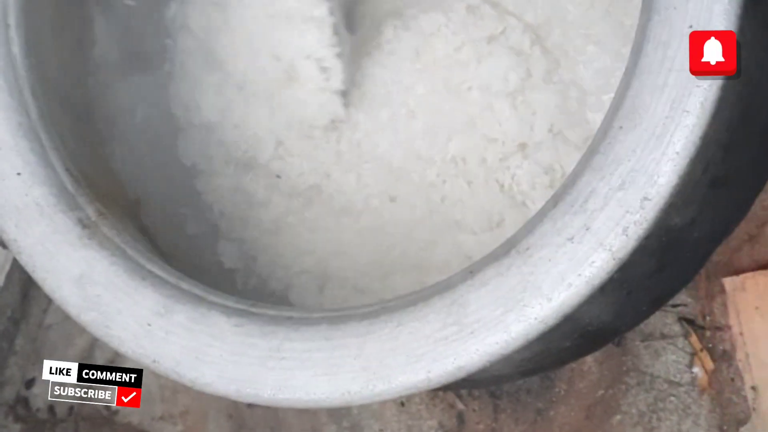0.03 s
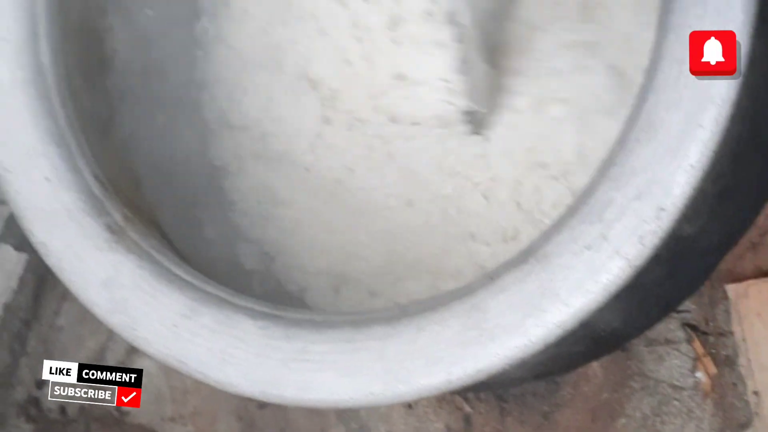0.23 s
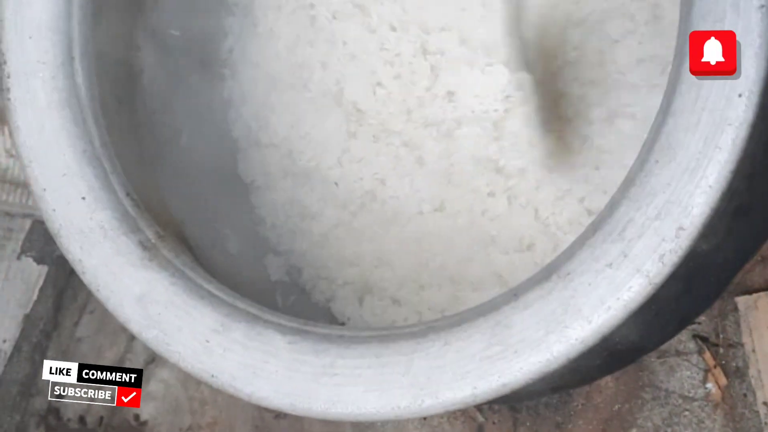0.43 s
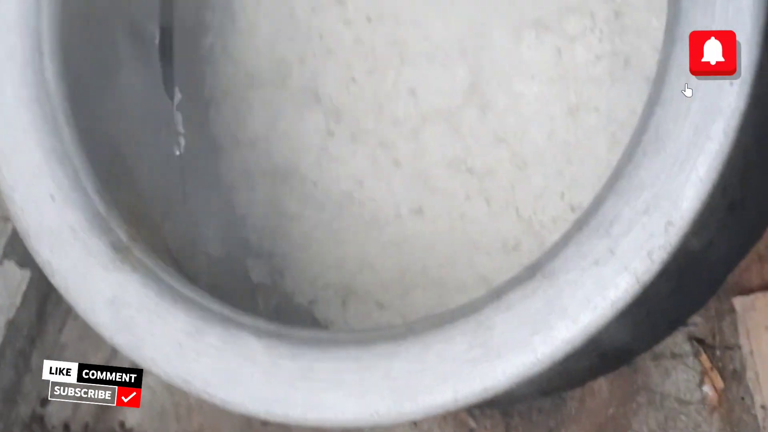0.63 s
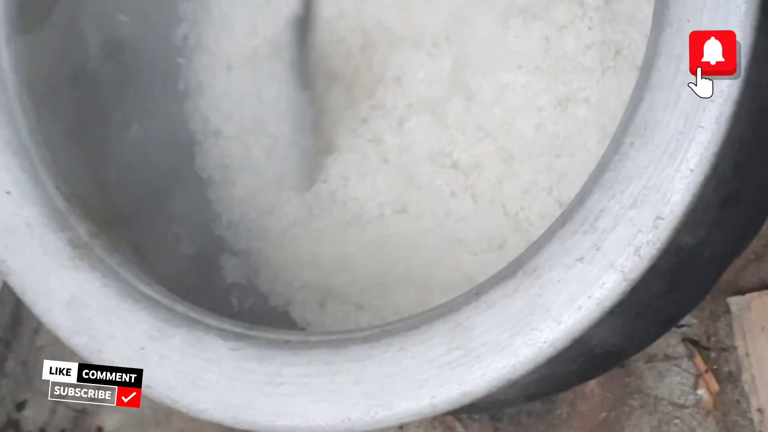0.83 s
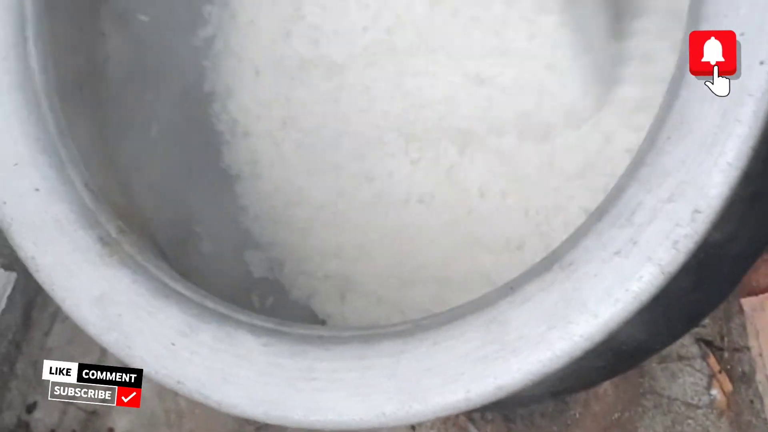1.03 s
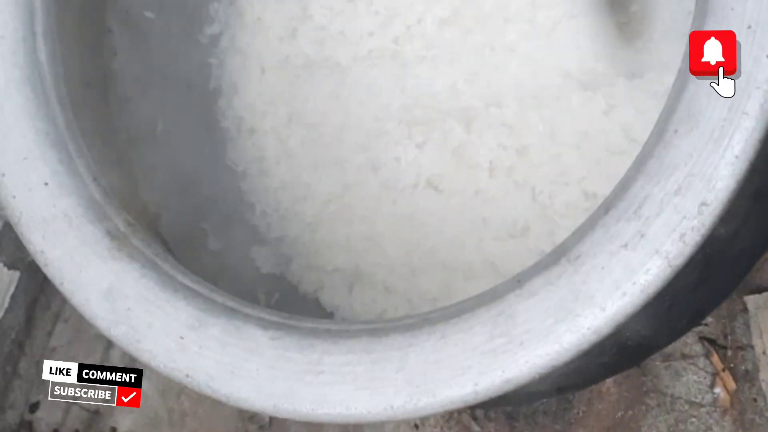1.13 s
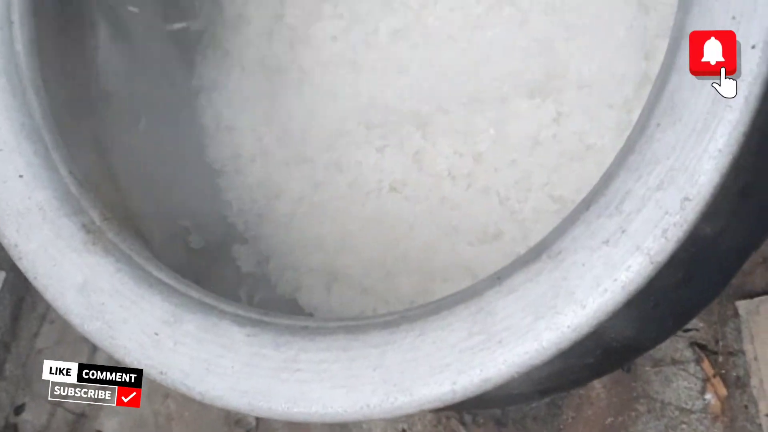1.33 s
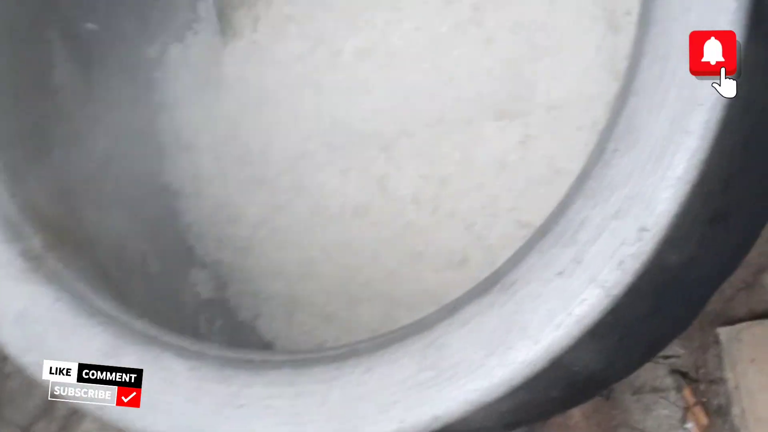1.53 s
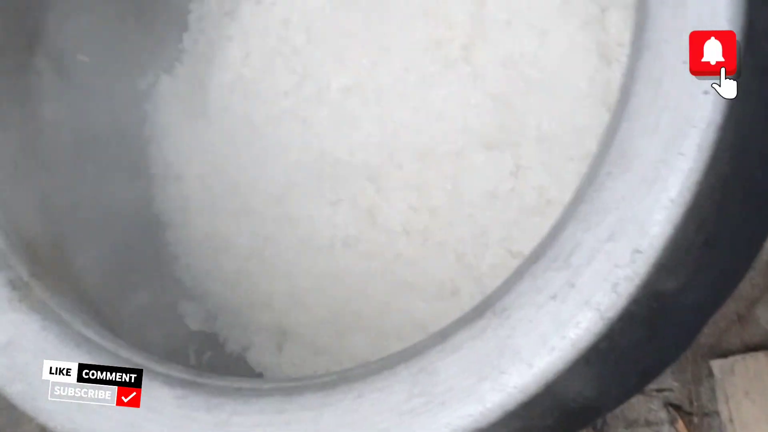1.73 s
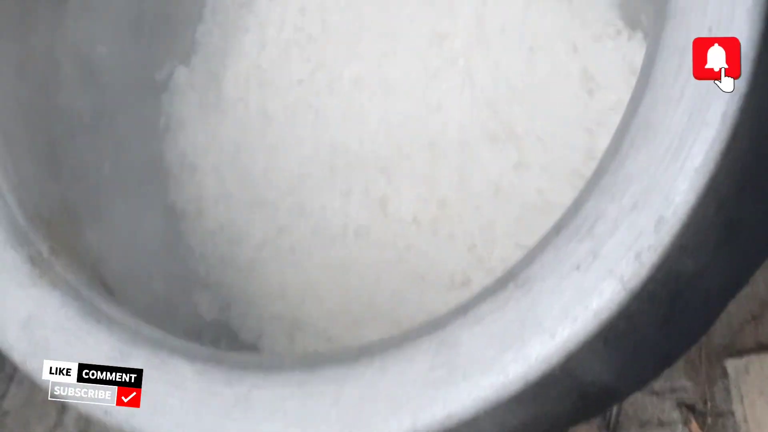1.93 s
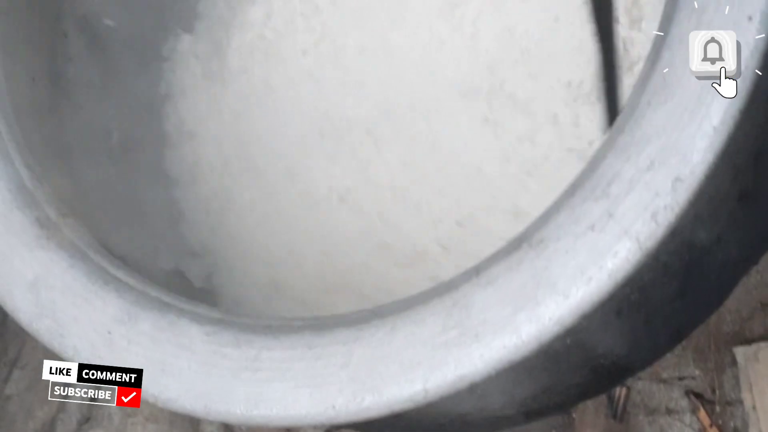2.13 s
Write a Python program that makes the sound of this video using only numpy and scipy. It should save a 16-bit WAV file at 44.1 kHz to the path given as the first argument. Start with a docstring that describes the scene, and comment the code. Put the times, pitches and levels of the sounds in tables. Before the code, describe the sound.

Water splashes into a metal pot of rice in a quiet kitchen. Until about 1.4 seconds there are only faint rubs against the pot over a low rumble. At 1.5 seconds water slaps in with sharp cracks on the metal, becoming a hollow, drumming rush with bright spray and short ringing notes. It peaks around 1.8 to 2 seconds, then dies away. Nearly everything is on the right.

```python
"""A quiet kitchen: over the low rumble of the house come faint rubs against a metal pot of rice.
Then water suddenly hits the pot: a first slap, a drumming rush, a bright spray that dies away.
The impacts of the drops splash broadly and force the pot's air space and walls to resonate; single
notes sing out, and hard contacts crack on the wall. The sound lies on the right; the left carries
only a dull, faint leak and a diffuse wash."""
import sys
import numpy as np
from scipy import signal
from scipy.io import wavfile

SR = 44100
rng = np.random.default_rng(int(sys.argv[2]) if len(sys.argv) > 2 else 0)


def store_wav(level_fs):
    """Save 16-bit WAV to argv[1]."""
    pcm = np.round(np.clip(np.atleast_2d(level_fs), -1, 1) * 32767)
    wavfile.write(sys.argv[1], SR, pcm.T.astype(np.int16))


N = 96402

# Force of the stream in seven registers (all levels in the tables are relative):
# t/s, then level/dB of slosh, thrum, hollow, low wall ring, high wall ring, spray, mist
STREAM_FORCE = [(1.528, -52, -31, -28, -52, -51, -52.5, -80),
                (1.574, -49, -36, -32.5, -56.5, -55, -62, -77),
                (1.642, -35.5, -32.5, -29.5, -44.5, -41, -50, -64),
                (1.67, -41.5, -27, -25.5, -46, -43, -47.5, -63.5),
                (1.686, -31.5, -36, -32.5, -60, -29, -39.5, -62),
                (1.698, -50, -32.5, -25.5, -44, -36, -51.5, -67),
                (1.712, -30, -26.5, -48, -41, -31.5, -44.5, -70),
                (1.728, -36, -24.5, -39, -37.5, -49, -46, -65),
                (1.746, -36, -28.5, -39, -40, -45, -47.5, -63),
                (1.774, -29.5, -35, -60, -40.5, -41.5, -54, -64.5),
                (1.798, -33, -39, -31, -29.5, -35, -47, -63),
                (1.836, -53, -37.5, -33.5, -36.5, -30.5, -42.5, -64.5),
                (1.958, -50, -33.5, -41.5, -33, -29.5, -39.5, -56),
                (1.98, -33, -34, -62, -36.5, -30, -41, -61), (2.002, -33, -36, -42, -34, -40, -52, -70),
                (2.026, -44, -28.5, -39, -61, -40, -59, -74),
                (2.064, -42.5, -35, -48, -47, -49, -52.5, -68),
                (2.146, -43, -46, -35.5, -51.5, -53.5, -58, -76),
                (2.156, -52, -44, -43, -52, -45.5, -54, -76), (2.186, -52, -38, -48.5, -58, -54, -65, -76)]
# Slaps of water on the metal: t/s, low level/dB, wall ring level/dB, spray level/dB, decay/s
WATER_SLAPS = [(1.4563, -35.5, -42, -47, 0.027), (1.465, -57, -57, -42, 0.014),
               (1.5215, -29.5, -39, -43, 0.008), (1.531, -27, -60, -46, 0.0036),
               (1.685, -52, -32, -47, 0.0033), (1.71, -30.5, -48, -38, 0.0058),
               (1.787, -24.5, -47, -35, 0.0038), (1.799, -29, -31.5, -36.5, 0.0032),
               (1.984, -42, -46, -46, 0.0018)]
# Normal modes of the pot's air space and walls: f/Hz, bandwidth/Hz, level/dB
POT_MODES = [(240.6, 24, -3.5), (296, 19.4, 3), (354.8, 18, -1.5), (399, 34, -4.5), (617, 38.6, -2),
             (636.5, 42, -2), (713.3, 31, -1.5), (743, 27.4, -1), (1041, 25, 7), (1168.6, 45, 4),
             (1686, 13, -7), (1842.6, 19, 5), (1944, 15, 4.5), (1996, 122, 1), (2235, 12.4, 3),
             (2343, 21, 6), (2444, 24, -5), (2805, 31, 0), (3160, 22, 4), (3295, 35, -2.5), (3580, 15, -3),
             (3670, 41, -7), (4366, 17, -1), (5050, 28, -5)]
# Edges of the five registers into which the modes fall: f/Hz
MODE_EDGES = [200, 480, 975, 1300, 2900, 7000]
# Spectrum of the broad splash as heard, with a deep dip near 9 kHz: f/Hz, level/dB
SPLASH_SPECTRUM = [(90, -17), (316, -1), (581, -5.5), (737, 3), (876, -12.5), (1070, -18), (2320, -21),
                   (4360, -25), (8910, -53.5), (13500, -33), (16000, -49.5)]
# Edges of the six splash bands: f/Hz
SPLASH_EDGES = [90, 220, 860, 1300, 2900, 8800, 16000]
# Splash in each band against the force that drives it: level/dB
SPLASH_SHARES = [-9.5, 0.5, -6, -4, -1.5, 1]
# Notes of the pot set singing by a light touch or a gulp of water: t/s, level/dB, f/Hz, rise/s, decay/s
POT_NOTES = [(0.845, -56.5, 297, 0.005, 0.014), (1.258, -77, 1860, 0.001, 0.005),
             (1.259, -78.5, 2840, 0.0013, 0.0051), (1.457, -34.5, 173.5, 0.0024, 0.0068),
             (1.468, -45, 3070, 0.0014, 0.012), (1.9, -36.5, 2453, 0.025, 0.035),
             (1.86, -36, 250.3, 0.0087, 0.029), (1.865, -31.5, 1180, 0.022, 0.036),
             (1.92, -39.5, 1052, 0.017, 0.07), (2.02, -35, 1084, 0.0024, 0.02),
             (2.03, -39, 372, 0.025, 0.11), (1.457, -26, 306.5, 0.0011, 0.012),
             (1.524, -24.5, 290.3, 0.00073, 0.049), (1.5345, -47, 620, 0.00061, 0.0032),
             (1.628, -23.5, 276, 0.0019, 0.0086), (1.66, -26.5, 300, 0.0065, 0.01),
             (1.682, -26.5, 2350, 0.0032, 0.0022), (1.683, -26, 1633, 0.00096, 0.0042),
             (1.706, -29.5, 2086, 0.0021, 0.011), (1.738, -21.5, 750, 0.0074, 0.0077),
             (1.7985, -19, 740, 0.0065, 0.0032), (1.7983, -22.5, 2276, 0.0033, 0.0053),
             (1.819, -26.5, 350, 0.0037, 0.019), (1.838, -26.5, 2294, 0.0039, 0.014),
             (1.872, -22, 2310, 0.0045, 0.0084), (1.876, -30, 714, 0.012, 0.054),
             (1.882, -30, 2770, 0.0025, 0.016), (1.98, -35, 303, 0.0016, 0.0035),
             (1.996, -31, 723, 0.0036, 0.0063)]
# Hard contacts on the pot wall: t/s, level/dB
WALL_KNOCKS = [(0.8415, -65), (1.2595, -70), (1.4557, -25.5), (1.4688, -32), (1.5231, -41), (1.5335, -33.5)]
# Faint rubs against the pot before the pour: t/s, duration/s, level/dB, favoured f/Hz
POT_RUBS = [(0.051, 0.11, -63.5, 360), (0.097, 0.23, -70.5, 566), (0.134, 0.24, -83.5, 1130),
            (0.49, 0.22, -67, 295), (0.837, 0.15, -75, 774), (1.259, 0.025, -73, 757),
            (0.835, 0.061, -76, 1500), (1.225, 0.05, -57, 284)]
# Diffuse wash on the left against the pot on the right: t/s, low band level/dB, high band level/dB
WASH_LEVELS = [(1.55, -54, -57), (1.65, -56, -44), (1.79, -35, -46), (1.9, -44, -43.5), (1.99, -33.5, -41),
               (2.06, -43, -42)]
# Spectral density of the house rumble: f/Hz, level/dB
RUMBLE_SPECTRUM = [(25, -20), (65, 7.5), (86, -6), (108, -9.5), (200, -16), (300, -9.5), (421, -17),
                   (763, -33.5), (985, -34), (4000, -52)]
# Slow swell of the rumble: t/s, level/dB
RUMBLE_SWELL = [(0, -3.5), (.06, 4.5), (.15, -3), (.3, -4.5), (.6, 0), (.9, 0.5), (1.15, -1), (1.45, 1.5),
                (2.19, 9)]

STREAM_START_S, SLAP_RISE_S, MIST_BELOW_SPRAY_DB = 1.5222, 0.00063, 16
BASE_DROPS_PER_S, DROP_SPREAD_DB, CLUMP_DB = 3000, 3, 4.5
CRACK_DECAY_S, RUB_SPREAD_OCTAVES = 0.00072, 0.13
POT_LEAK_DB, ROOM_LEAK_DB, LEAK_CORNER_HZ, WASH_S = -30, -22, 153, 0.047
HISS_DB, HISS_TOP_DB, CUTOFF_HZ = -84, -93, 16250
TIME = np.arange(N) / SR


def water():
    """Source and filter: one hail of drops, weighted by the stream's force, drives modes and splash."""
    drops = drop_impacts()
    slosh, thrum, hollow, low_ring, high_ring, spray, mist = stream_force()
    ringing = pot_resonance(drops, [thrum, hollow, low_ring, high_ring, spray])
    return ringing + splash(drops, [np.sqrt(thrum * slosh), slosh, low_ring, high_ring, spray, mist])


def drop_impacts():
    """Shot noise: impulses of uneven size arrive at random, in clumps, over a continuous rush."""
    sizes = amp(DROP_SPREAD_DB * np.minimum(rng.exponential(1, N), 5))
    lands = rng.random(N) < BASE_DROPS_PER_S * amp(CLUMP_DB * drift(corner_hz=60)) / SR
    return sizes * lands * rng.choice([-1, 1], N) + 0.31 * rng.standard_normal(N)


def stream_force():
    """Incoherent addition: in each register the powers of the pour and of the short slaps add."""
    power = amp(in_time(STREAM_FORCE)) ** 2 * (TIME > STREAM_START_S)
    for start, low_db, ring_db, spray_db, decay in WATER_SLAPS:
        age = np.maximum(TIME - start, 0)
        levels = amp([low_db] * 3 + [ring_db] * 2 + [spray_db, spray_db - MIST_BELOW_SPRAY_DB])
        envelope = (1 - np.exp(-age / SLAP_RISE_S)) * np.exp(-age / max(decay, .002))
        power += (levels[:, None] * envelope) ** 2
    return np.sqrt(power)


def pot_resonance(drops, forces):
    """Forced vibration: the drops excite the pot's modes, each register under its own force."""
    out = 0
    for low, high, force in zip(MODE_EDGES, MODE_EDGES[1:], forces):
        drives = np.array([drops, drops * force + 1e-18])  # the steady drive sets the scale
        modes = sum((-1) ** k * amp(db) * resonate(drives, hz, width)
                    for k, (hz, width, db) in enumerate(POT_MODES) if low <= hz < high)
        steady, forced = band(modes, low, high)
        out += amp(-5) * forced / rms(steady)
    return out


def splash(drops, forces):
    """Impact noise: brief impulses give a broad splash, heard with a deep dip near 9 kHz."""
    out = 0
    for low, high, force, share_db in zip(SPLASH_EDGES, SPLASH_EDGES[1:], forces, SPLASH_SHARES):
        drives = np.array([drops, drops * force + 1e-18])
        steady, forced = colour(drives, SPLASH_SPECTRUM, low, high, flicker_db=1.6)
        out += amp(share_db) * forced / rms(steady)
    return out


def pot_notes():
    """Damped oscillation: each note swells quickly, then decays exponentially at one frequency."""
    out = 0
    for start, db, hz, rise, decay in POT_NOTES:
        age = np.maximum(TIME - start, 0)
        envelope = (1 - np.exp(-age / max(rise, .001))) ** 2 * np.exp(-age / max(decay, .002))
        out += amp(db) * envelope / envelope.max() * np.sin(2 * np.pi * (hz * age + rng.random()))
    return out


def knocks():
    """Impulsive contact: a very short burst gives a bright crack, weak near 9 kHz like the splash."""
    envelope = sum(amp(db) * (TIME > start) * np.exp(-np.maximum(TIME - start, 0) / CRACK_DECAY_S)
                   for start, db in WALL_KNOCKS)
    crack = rng.standard_normal(N) * envelope + 1e-18
    body = band(band(crack, 900, 5000), 900, 5000)
    top = band(band(crack, 11000, 15400), 11000, 15400)
    return body + amp(-17) * top


def rubs():
    """Frictional excitation: each soft rub stirs the modes nearest its favoured frequency."""
    out, friction = 0, rng.standard_normal(N)
    for hz, width, _ in POT_MODES:
        force = 0
        for start, duration, db, favoured_hz in POT_RUBS:
            progress = np.clip((TIME - start) / duration, 0, 1)
            stroke = np.sin(np.pi * np.sqrt(progress))  # quick to start, slow to fade
            coupling = np.exp(-(np.log2(hz / favoured_hz) / RUB_SPREAD_OCTAVES) ** 2)
            force += amp(db) * stroke * coupling
        drive = resonate(friction * force + 1e-18, hz, 12 * width)
        out += resonate(drive, hz, width) * np.sqrt(SR / np.pi / width)  # evens out power across widths
    return out


def diffuse_wash(pot):
    """Smearing: convolution with a short noise burst turns the pot's sound into a faint wash on the left, in a
    low and a high band."""
    scatter = rng.standard_normal(int(WASH_S * SR))
    wash = signal.fftconvolve(pot, scatter / np.linalg.norm(scatter))[:N]
    low_gain, high_gain = amp(in_time(WASH_LEVELS))
    return low_gain * band(wash, 400, 1660) + high_gain * band(wash, 1250, 5400)


def house_rumble():
    """Amplitude modulation: the low, coloured noise of the house swells slowly."""
    rumble = colour(rng.standard_normal(N), RUMBLE_SPECTRUM, 34, 4000, flicker_db=2.0)
    rumble = np.roll(rumble, -SR // 10)  # already sounding at t = 0
    return amp(-60.5 + in_time(RUMBLE_SWELL)[0]) * rumble / rms(rumble)


def resonate(x, hz, width):
    """Response of a damped oscillator of frequency hz and half-power bandwidth width/Hz."""
    r = np.exp(-np.pi * width / SR)
    gain = (1 - r * r) / 2
    return signal.lfilter([gain, 0, -gain], [1, -2 * r * np.cos(2 * np.pi * hz / SR), r * r], x)


def colour(x, spectrum, low_hz, high_hz, flicker_db):
    """Spectral shaping: bands of about a third of an octave flicker independently about the spectrum."""
    edges = np.geomspace(low_hz, high_hz, 2 + int(3 * np.log2(high_hz / low_hz)))
    hz, db = np.transpose(spectrum)
    out = 0
    for k, (low, high) in enumerate(zip(edges, edges[1:])):
        centre_db = np.interp(np.log(low * high) / 2, np.log(hz), db)
        out += (-1) ** k * amp(centre_db + flicker_db * drift(corner_hz=11.4)) * band(x, low, high)
    return out


def drift(corner_hz):
    """Slow random fluctuation: low-passed noise of unit RMS."""
    step, settling = 40, 2000
    r = np.exp(-2 * np.pi * corner_hz * step / SR)
    noise = rng.standard_normal(N // step + settling + 2)
    slow = signal.lfilter([1], [1, -2 * r, r * r], noise)[settling:]
    return np.interp(np.arange(N) / step, np.arange(len(slow)), slow / rms(slow))


def band(x, low_hz, high_hz):
    """Band-pass filtering between two half-power frequencies."""
    return signal.sosfilt(signal.butter(2, [low_hz, high_hz], "band", fs=SR, output="sos"), x)


def in_time(rows):
    """Linear interpolation of a table's columns over time."""
    times, *columns = np.transpose(rows)
    return np.array([np.interp(TIME, times, column) for column in columns])


def amp(db):
    """Amplitude ratio of a level in decibels."""
    return 10 ** (np.asarray(db) / 20)


def rms(x):
    """Root-mean-square amplitude."""
    return np.sqrt(np.mean(x ** 2) + 1e-20)


def scene():
    """Superposition: the sources add on the right; a low-passed leak and the wash reach the left."""
    pot = 2 * (water() + pot_notes() + knocks())
    room = 2 * (rubs() + house_rumble())
    dull = signal.butter(1, LEAK_CORNER_HZ, fs=SR, output="sos")
    leak = signal.sosfilt(dull, amp(POT_LEAK_DB) * pot + amp(ROOM_LEAK_DB) * room)
    return np.array([leak + diffuse_wash(pot), pot + room])


def record(dry):
    """Noise floor and band limit: each side gains its own hiss, a little stronger high up; then a cut."""
    white, top = rng.standard_normal((2, 2, N))
    hiss = amp(HISS_DB) * white + amp(HISS_TOP_DB) * band(top, 10600, 15400)
    return signal.sosfilt(signal.cheby2(16, 70, CUTOFF_HZ, fs=SR, output="sos"), dry + hiss)


dry = scene()
out = record(dry)
store_wav(out)
```